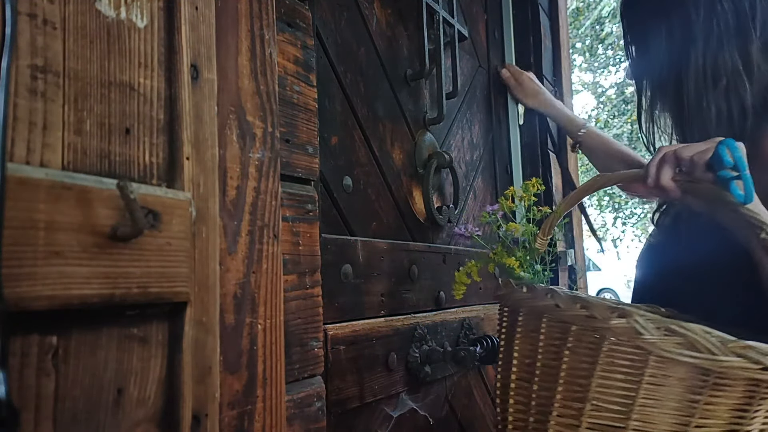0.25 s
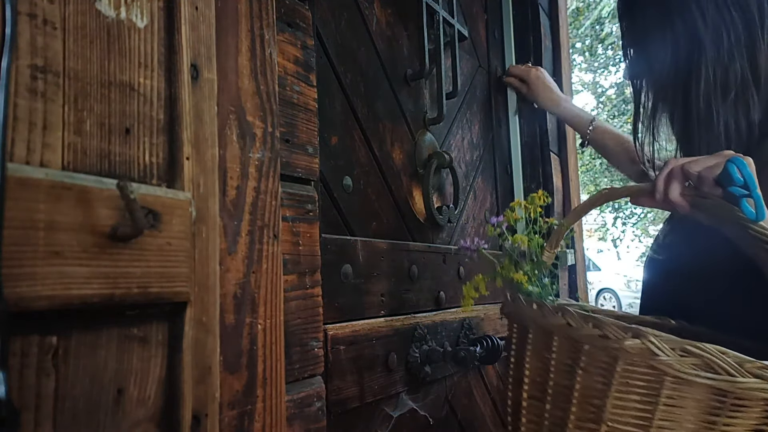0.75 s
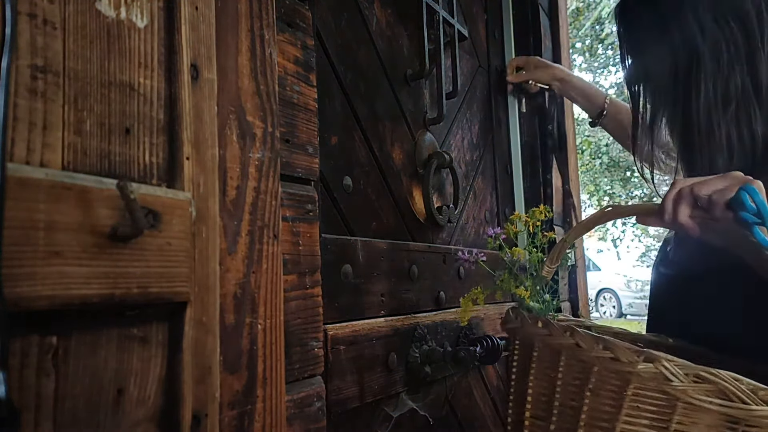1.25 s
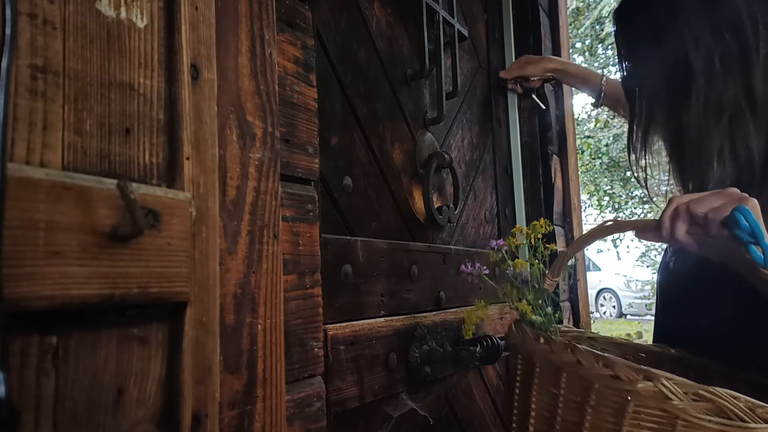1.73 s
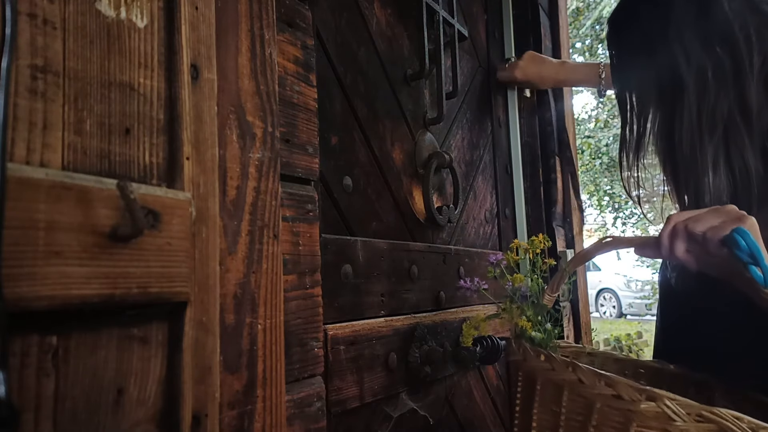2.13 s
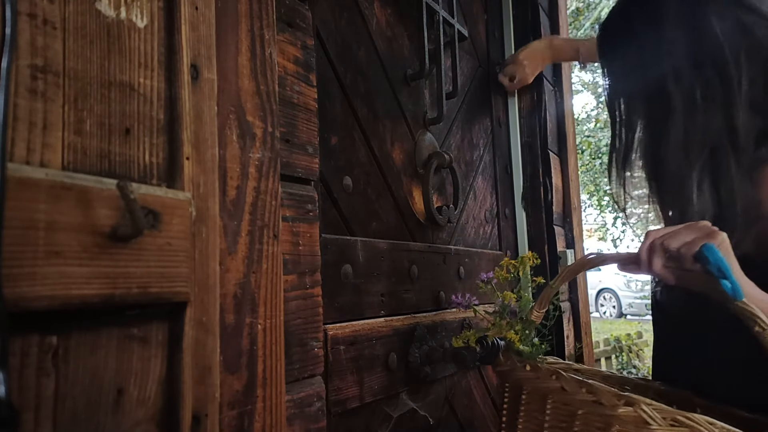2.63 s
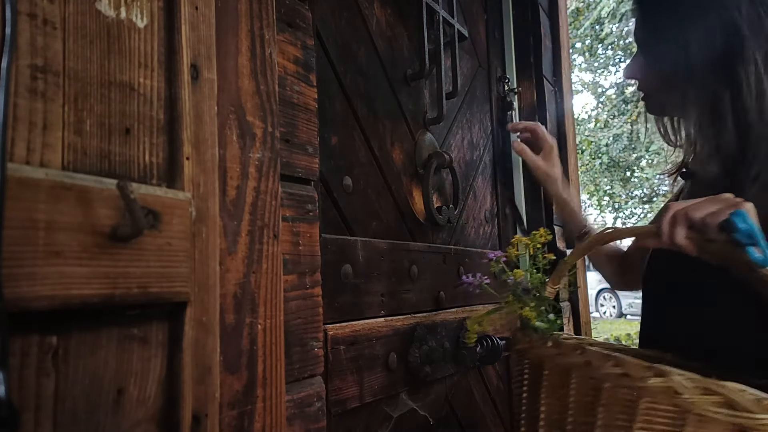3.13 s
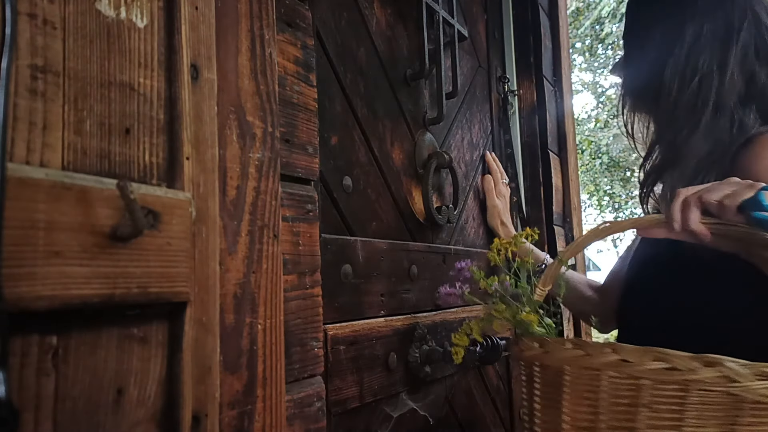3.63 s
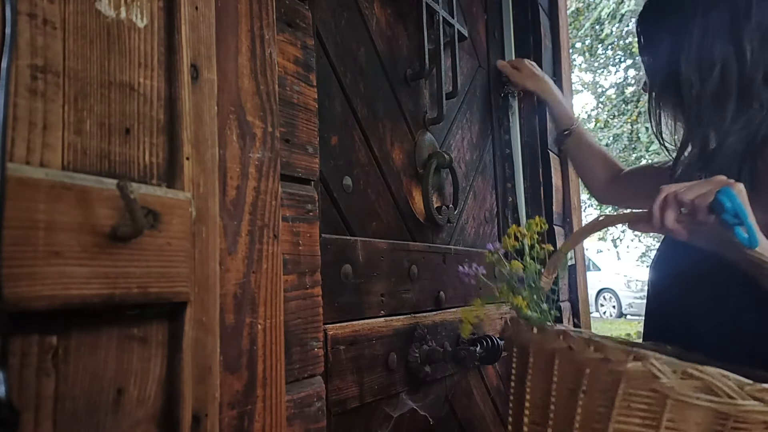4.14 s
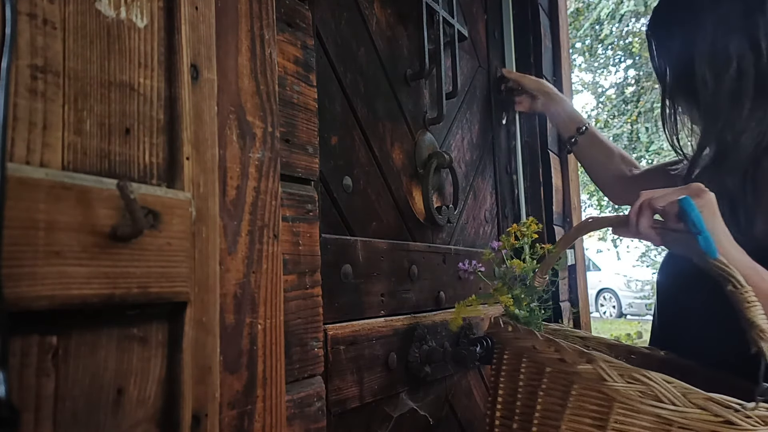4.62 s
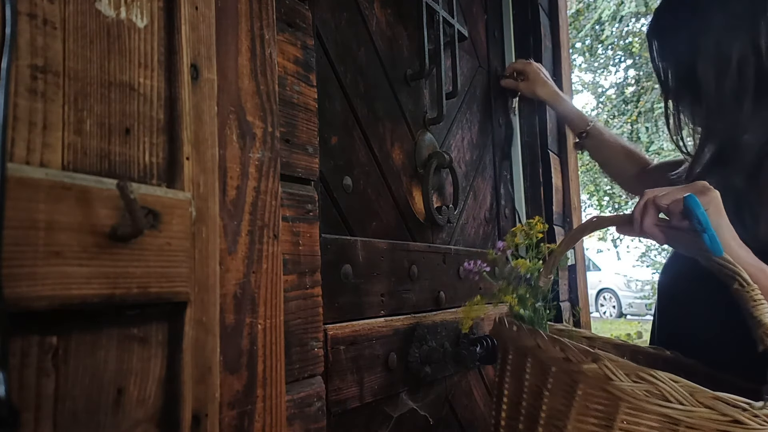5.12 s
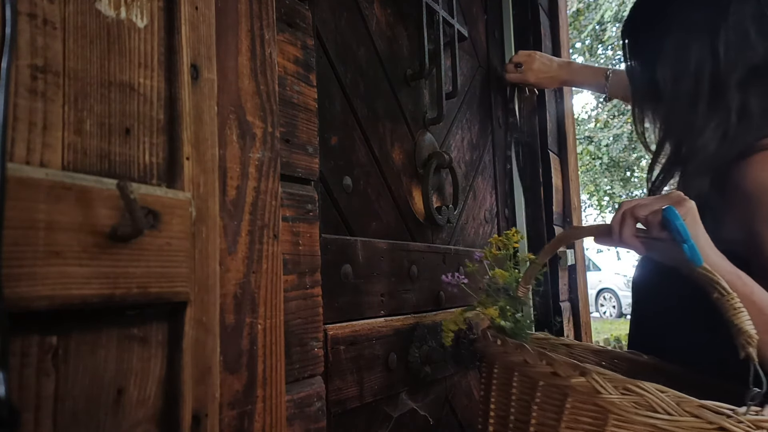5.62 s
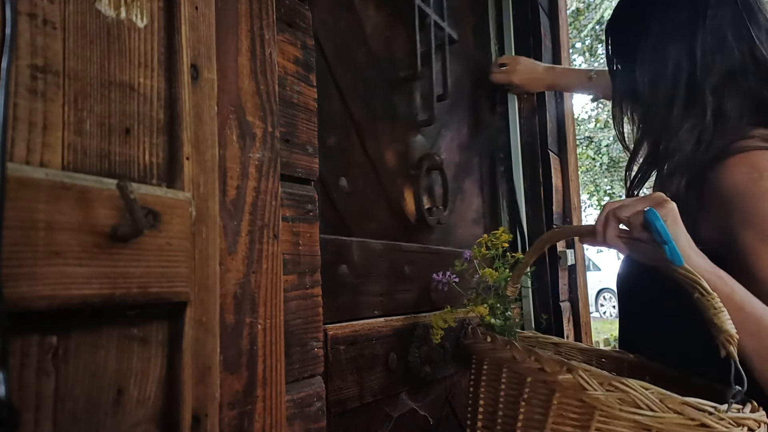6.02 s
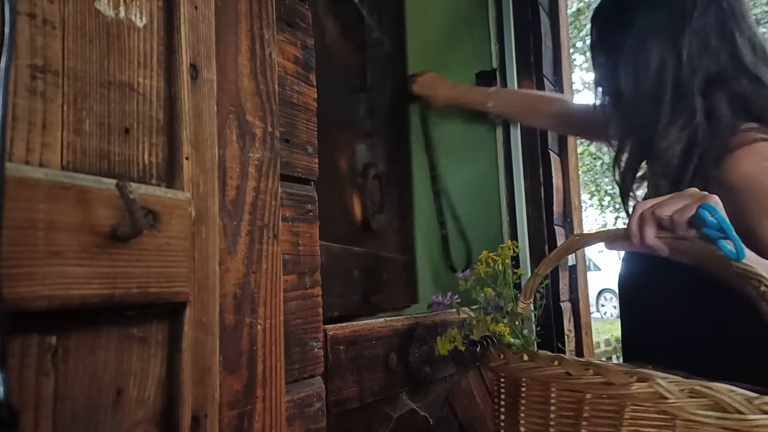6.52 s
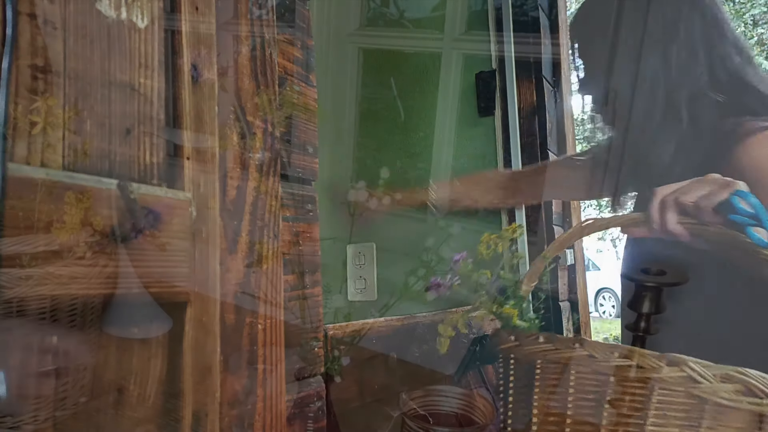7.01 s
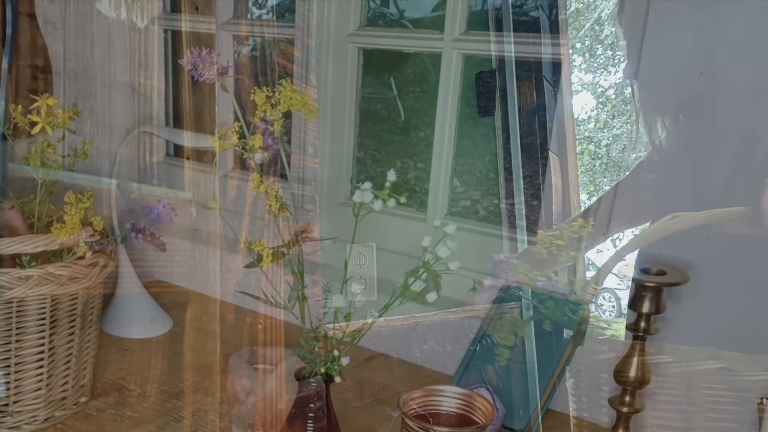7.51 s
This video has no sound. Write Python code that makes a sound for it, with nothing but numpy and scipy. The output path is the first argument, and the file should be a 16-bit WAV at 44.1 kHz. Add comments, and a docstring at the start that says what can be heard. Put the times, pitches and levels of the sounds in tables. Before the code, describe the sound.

Close to an old wooden door, a key clicks and knocks in an iron lock while keys chink. The bolt clacks over with a woody thump, the keys jingle brightly, then there is a quiet pause. More clicks follow, a second softer bolt clatter, scraping, and thin high hinge squeaks as the door opens. A low outdoor rumble and soft hiss run beneath.

```python
"""Clicks, scrapes and two iron clatters come from the lock of an old wooden door, and keys jingle on their ring.
The door is pushed open with thin hinge squeaks; a low rumble and soft hiss come from outdoors behind the porch.
Knocks and scrapes are bursts of noise that ring in the lock case; the thrown bolt also shakes the planks.
Keys are decaying tones set off by contact noise, squeaks are wavering tones, and outdoors is coloured noise."""
import sys
import numpy as np
from scipy import signal
from scipy.fft import rfft, irfft
from scipy.io import wavfile
from scipy.ndimage import uniform_filter1d

SR = 44100
rng = np.random.default_rng(int(sys.argv[2]) if len(sys.argv) > 2 else 0)


def waveform_to_disk(signal):
    """Save audio, clipped to [-1, 1], as 16-bit WAV at the path in sys.argv[1]."""
    frames = np.transpose(np.atleast_2d(signal))
    scaled = np.clip(frames, -1, 1) * 32767
    samples = np.round(scaled).astype(np.int16)
    wavfile.write(sys.argv[1], SR, samples)


N = 342216
HIT_SIZE = 16384  # samples in one hit
HIT_LEAD_S = 0.03  # a hit starts this long before the parts meet
AGE = np.arange(HIT_SIZE) / SR  # seconds since the start of a hit
TIME = np.arange(N) / SR  # seconds since the start of the scene

# the bolt reaching its stop: (time [s], level [dB], strongest ring [Hz])
THROWS = [(2.5703, -6, 1300), (5.4866, -11, 2130)]


def undb(db):
    """Turn decibels into gain."""
    return 10 ** (np.asarray(db) / 20)


def fade(t60):
    """Die away by 60 dB in t60 seconds."""
    return np.exp(-np.log(1000) * AGE / max(t60, 1e-3))


def level(x, db, span_s=0.01):
    """Scale a hit so that its energy, packed into span_s, has this rms level."""
    packed_power = np.mean(np.sum(x ** 2, axis=1)) / (span_s * SR)
    return x * undb(db) / np.sqrt(packed_power)


def curve(points, size):
    """Join (pitch [Hz], gain [dB]) points on a log-frequency axis, one value per FFT bin."""
    hz, db = np.transpose(points)
    bin_hz = np.fft.rfftfreq(size, 1 / SR)
    return np.interp(np.log(bin_hz + 1), np.log(hz), db)


def shape(x, db):
    """Filter with the given gain per bin; minimum phase lets the peaks ring on after a hit."""
    size = x.shape[-1]
    cepstrum = irfft(np.log(undb(db)), size)
    # folding the second half onto the first makes the filter act only forwards in time
    cepstrum[1:size // 2] *= 2
    cepstrum[size // 2 + 1:] = 0
    return irfft(rfft(x) * np.exp(rfft(cepstrum)), size)


def band(x, hz, kind):
    """Keep the low, middle or high part of a sound with a third-order filter."""
    return signal.sosfilt(signal.butter(3, hz, kind, fs=SR, output="sos"), x)


def add(out, s, x):
    """Mix x into out from time s on."""
    start = max(int(s * SR), 0)
    out[:, start:start + x.shape[1]] += x[:, :out.shape[1] - start]


def wander(rate, size=N):
    """Drift smoothly and randomly, with a spread near 1 and a new target rate times a second."""
    hold = int(SR / rate)
    steps = np.repeat(rng.standard_normal(size // hold + 1), hold)
    return np.sqrt(1.5) * uniform_filter1d(steps, hold)[:size]


def stereo_noise(alike_hz=1700, lag_ms=0.075):
    """Noise from the right: the left ear hears it later, and reflections make the treble unlike."""
    hz = np.fft.rfftfreq(HIT_SIZE, 1 / SR)
    likeness = 1 / (1 + hz / alike_hz)
    noise = rfft(rng.standard_normal((2, HIT_SIZE)))
    mid, side = noise * np.sqrt([1 + likeness, 1 - likeness])
    delay = np.exp(-2j * np.pi * hz * lag_ms / 1000)
    return irfft([(mid + side) * delay, mid - side])


def ring(hz, t60, scatter_db, detune):
    """One mode of a metal part; it differs from blow to blow and reaches each ear with its own share."""
    gain = undb(scatter_db * (rng.standard_normal((2, 1)) + rng.standard_normal()))
    pitch = hz * (1 + detune * rng.standard_normal())
    return gain * fade(t60) * np.sin(2 * np.pi * (pitch * AGE + rng.random((2, 1))))


def contact(t60, tail_db, tail_t60, rub_db, rub_s, grain_db, rise_s, closing_s=0.013):
    """Two parts rub as they close, meet HIT_LEAD_S later, chatter and slide on; the porch answers."""
    before, after = np.maximum(HIT_LEAD_S - AGE, 0), np.maximum(AGE - HIT_LEAD_S, 0)
    chatter = undb(-60 * after / t60)
    porch = undb(tail_db - 60 * after / tail_t60)
    blow = (1 - np.exp(-after / rise_s)) * (chatter + porch)
    fade_in = np.minimum(AGE / HIT_LEAD_S, 1)
    rub = undb(rub_db) * np.exp(-before / closing_s - after / rub_s) * fade_in
    grain = undb(grain_db * wander(500, size=HIT_SIZE))
    return stereo_noise() * (blow + rub) * grain


def rattle(length_s, per_s, rise_s, tail_db=-20, tail_t60=0.21, build_db=5):
    """Small, uneven contacts begin HIT_LEAD_S in, last length_s and tend to build up in the first half."""
    t60, scatter_db = 0.04, 8  # fade of one contact [s], unevenness [dB]
    count = max(int(length_s * per_s), 1)
    one = (1 - np.exp(-AGE / rise_s)) * (fade(t60) + undb(tail_db) * fade(tail_t60))
    power = np.zeros((1, HIT_SIZE))
    for k, (late, size) in enumerate(rng.uniform(-1, 1, (count, 2))):
        s = HIT_LEAD_S + length_s * min((k + (1 + late) / 2) / count, 1)
        gain = undb(scatter_db * size + build_db * min(2 * k / count, 1))
        add(power, s, (gain * one[None]) ** 2)
    return stereo_noise() * np.sqrt(power)


def outdoors(air_db=-9.5, rumble_top_hz=280):
    """A deep rumble, nearly the same in both ears, and a wide hiss; each swells in its own time."""
    # rise and fall: (time [s], rumble level [dB], hiss level [dB]); each counts from its middle value
    swell_points = [(0.0, -42.5, -47.5), (4.62, -41, -46), (5.42, -37.5, -47), (6.92, -41, -46.5),
                    (7.76, -43, -51.5)]
    # colour of the sound common to both ears: (pitch [Hz], relative level [dB])
    air_mid = [(15, -21), (26, -9), (43, -16), (56, 3.5), (76, -3), (97, -9.5), (150, -13), (290, -27.5),
               (600, -28), (730, -24), (1200, -27), (4000, -44), (5500, -57.5), (7700, -61), (8400, -55.5),
               (11500, -83), (16000, -80)]
    # colour of the sound unlike in the two ears: (pitch [Hz], relative level [dB])
    air_side = [(15, -41), (60, -37), (120, -25.5), (230, -33), (600, -35), (730, -27), (1150, -25.5),
                (4000, -44), (5500, -57), (7700, -58.5), (8400, -58.5), (11500, -78), (16000, -83)]
    mid = irfft(rfft(rng.standard_normal(N)) * undb(curve(air_mid, N)), N)
    side = irfft(rfft(rng.standard_normal(N)) * undb(curve(air_side, N)), N)
    air = np.array([mid + side, mid - side])
    s, *swells = np.transpose(swell_points)
    rumble_gain, hiss_gain = (undb(np.interp(TIME, s, db - np.median(db))) for db in swells)
    rumble = rumble_gain * band(air, rumble_top_hz, "lowpass")
    hiss = hiss_gain * band(air, rumble_top_hz, "highpass")
    return undb(air_db) * (rumble + hiss)


def planks(thump_db=-12):
    """The thrown bolt shakes the whole door, and its planks ring at low pitches."""
    # modes of the door planks: (pitch [Hz], relative level [dB], time to fade by 60 dB [s])
    plank_modes = [(125.5, -4.5, 0.44), (234, 0, 0.18), (276, -2.5, 0.11), (358, 1, 0.096), (383, 0, 0.13),
                   (501, 1.5, 0.07)]
    out, thump = np.zeros((2, N)), np.zeros(HIT_SIZE)
    for k, (hz, db, t60) in enumerate(plank_modes):
        # neighbouring modes start in opposite directions
        thump += (-1) ** k * undb(db) * fade(t60) * np.sin(2 * np.pi * hz * AGE)
    for s, db, _ in THROWS:
        add(out, s, level(np.array([thump, thump]), db + thump_db))
    return out


def hinges(jitter=0.0035, flutter_db=2, octave_db=-32):
    """Dry iron slips in step with one of its modes: a thin, wavering whistle with a faint octave."""
    # squeaks: (start [s], length [s], pitch [Hz], rise of pitch at mid-swing [Hz],
    # level before the bite [dB], moment of hardest bite [s])
    squeaks = [(6.289, 0.26, 6450, 60, -46.5, 6.535), (6.56, .09, 5100, 18, -68, 6.59),
               (7.01, 0.14, 4475, 10, -51.5, 7.048)]
    attack_s, release_t60 = 0.017, 0.25
    bite_db, bite_s = 14, 0.026  # swell as the hinge bites, and how far it spreads to each side
    out, age = np.zeros((2, N)), TIME[:SR]
    for s, length_s, hz, rise_hz, db, bite_at in squeaks:
        swing = np.sin(np.pi * np.minimum(age / length_s, 1))
        pitch = (hz + rise_hz * swing) * (1 + jitter * wander(130, size=SR))
        phase = 2 * np.pi * np.cumsum(pitch) / SR
        bite = bite_db * np.exp(-((s + age - bite_at) / bite_s) ** 2)
        release = np.exp(-np.log(1000) * np.maximum(age - length_s, 0) / release_t60)
        grip = np.minimum(age / attack_s, 1) * release * undb(db + bite)
        tone = grip * (np.sin(phase) + undb(octave_db) * np.sin(2 * phase))
        flutter = undb(flutter_db * np.array([wander(45, size=SR), wander(43, size=SR)]))
        add(out, s, tone * flutter)
    return out


def bunch(push, clash_db=-3):
    """Contacts set the bunch of keys shimmering, and their edges scrape."""
    # modes of the keys: (pitch [Hz], relative level [dB], time to fade by 60 dB [s])
    key_modes = [(6300, -20, 0.088), (6860, -9.5, 0.39), (7100, -16, 0.16), (7360, -10, 0.14),
                 (7895, 18.5, 0.036), (8350, -10, 0.18), (9200, -20, 0.32), (10200, -10, 0.13),
                 (10600, -18, 0.24), (12130, -1, .14), (12650, -11, .08), (13170, -3, .13),
                 (13000, 15, 0.025), (13740, 9.5, 0.076), (14050, -3, 0.065), (15670, -20, .2)]
    # colour of the scraping edges: (pitch [Hz], gain [dB])
    edges = curve([(1500, -3), (5000, -15.5), (7500, 7.0), (11500, -6.5), (13600, 13.5),
                   (14800, -1), (16000, -9)], HIT_SIZE)
    modes = sum(undb(db) * ring(hz, t60, scatter_db=3.0, detune=0.0083) for hz, db, t60 in key_modes)
    # every moment of the push sets the modes ringing anew
    shimmer = signal.fftconvolve(modes, push, axes=1)[:, :HIT_SIZE]
    return level(shimmer, 0) + level(shape(push, edges), clash_db)


def sparkle(x, sparkle_db, sparkle_hz=11000):
    """Where a key is struck decides between its lower and upper modes."""
    lower = level(band(x, sparkle_hz, "lowpass"), 0)
    upper = level(band(x, sparkle_hz, "highpass"), sparkle_db)
    return lower + upper


def jingle(length_s, clear_db=-11, low_hz=6800, high_hz=14000, count=5):
    """The bunch tumbles; here and there one key swings free and rings at its own pitch."""
    tumble = bunch(rattle(length_s, per_s=280, rise_s=0.002))
    for when, pitch in rng.random((count, 2)):
        free = ring(low_hz + (high_hz - low_hz) * pitch, t60=0.14, scatter_db=2.0, detune=0.002)
        add(tumble, HIT_LEAD_S + length_s * when, level(free, clear_db))
    return tumble


def keys(main_db=0):
    """In a chink one key rings clearly over the bunch; in a jingle they all tumble together."""
    # one key striking another:
    # (time [s], level [dB], sparkle against the lower modes [dB], strongest ring [Hz])
    chinks = [(0.155, -38.5, -12, 8680), (0.1984, -48, 1, 7150), (0.563, -42, -11, 8050),
              (0.606, -48, 5, 8630), (1.26, -32, -21, 8600), (1.723, -29.5, -19, 8550),
              (2.004, -38.5, -10, 7060), (2.2853, -37, -22, 8430), (2.3984, -36.5, 4, 14000),
              (2.519, -34, -5, 10550), (2.768, -28.5, -18, 7183), (2.8163, -26, -19, 9100),
              (3.006, -25, 0, 12140), (3.0901, -24.5, -8, 7170), (4.669, -51, -10, 5100),
              (5.0782, -31.5, -11, 13500), (5.222, -44, 14, 13600)]
    # the whole bunch shaken:
    # (start [s], length [s], level [dB], sparkle against the lower modes [dB])
    jingles = [(2.37, .1, -31, -11), (2.63, .085, -38, -1), (3.022, 0.11, -22.5, -7), (5.23, 0.1, -50, 0),
               (5.499, .05, -41, -8), (6.874, .06, -36, -5), (7.023, 0.056, -27.5, 1)]
    out = np.zeros((2, N))
    for s, db, sparkle_db, hz in chinks:
        push = contact(t60=0.04, tail_db=-23, tail_t60=0.22, rub_db=-25, rub_s=0.011,
                       grain_db=6.5, rise_s=0.00067)
        chink = bunch(push)
        clear_key = ring(hz, t60=0.12, scatter_db=2, detune=0.001)
        add(chink, HIT_LEAD_S, level(clear_key, main_db))
        add(out, s - HIT_LEAD_S, undb(db) * sparkle(chink, sparkle_db))
    for s, length_s, db, sparkle_db in jingles:
        add(out, s - HIT_LEAD_S, undb(db) * sparkle(jingle(length_s), sparkle_db))
    return out


def door_colour():
    """Gain per bin (dB) of the door with the resonances of its lock case."""
    # broad colour of a knock: (pitch [Hz], gain [dB])
    broad_colour = [(40, 6), (120, -3), (300, -7), (560, -1), (1100, -1), (1800, 4), (3300, -5.5),
                    (5500, -7), (9500, -10.5), (12000, -21), (16000, -26)]
    # resonances of the lock case: (pitch [Hz], half width [Hz], lift [dB])
    case_modes = [(385, 160, 7), (640, 57, 0.5), (760, 23, 2), (942, 105, 12), (1307, 110, 6),
                  (1520, 42, 4), (2040, 390, 1.5), (2570, 32, 7.5), (2832, 30, 7), (3163, 56, 8.5),
                  (3514, 200, 7), (4540, 26, 9), (7040, 190, 5.5), (8230, 160, 10)]
    hz = np.fft.rfftfreq(HIT_SIZE, 1 / SR)
    lift = sum(db / (1 + ((hz - f) / width) ** 2) for f, width, db in case_modes)
    return curve(broad_colour, HIT_SIZE) + lift


def favour(ring_hz, ring_db, width_hz):
    """Lift per bin (dB) of the one resonance that the place of contact favours."""
    hz = np.fft.rfftfreq(HIT_SIZE, 1 / SR)
    return ring_db / (1 + ((hz - ring_hz) / width_hz) ** 2)


def lock_case(push, colour, hardness_db, snap=1, crest_db=8.5, wood_hz=1200, steel_hz=5500, narrowing=0.35):
    """The wood thuds, the lock case clacks, the steel ticks; hard contacts lose the thud, soft ones the tick."""
    thud_db, tick_db = -8.5, -11  # for a contact of middling hardness
    body, loss_db = shape(push, colour), narrowing * abs(hardness_db)
    thud = level(band(body, wood_hz, "lowpass"), thud_db - hardness_db - loss_db)
    clack = level(band(body, [wood_hz, steel_hz], "bandpass"), -crest_db)
    tick = level(band(body, steel_hz, "highpass") * snap, tick_db + hardness_db - loss_db)
    return thud + clack + tick


def scrapes():
    """Key and latch judder along the iron and shake the same lock case."""
    # iron sliding on iron: (start [s], length [s], level [dB], hardness [dB], strongest ring [Hz])
    slides = [(1.689, .08, -28, -5, 1350), (2.627, 0.019, -30, 14, 4400), (3.04, .075, -18, -1, 2060),
              (5.227, 0.033, -26.5, -0.5, 3570), (5.908, .025, -43.5, 7, 1480),
              (6.009, .018, -31, 8.5, 1470), (6.115, .07, -23.5, 2, 3410)]
    out, door = np.zeros((2, N)), door_colour()
    for s, length_s, db, hardness_db, ring_hz in slides:
        colour = door + favour(ring_hz, ring_db=13.5, width_hz=100)
        judder = rattle(length_s, per_s=160, rise_s=0.00059)
        add(out, s - HIT_LEAD_S, undb(db) * lock_case(judder, colour, hardness_db))
    return out


def blows():
    """List every blow on the lock: single knocks, the clatter of the bolt and chance ticks."""
    # knocks of key and latch: (time [s], level [dB], hardness [dB], strongest ring [Hz])
    # hardness: + is steel on steel, - is dull on wood
    single_knocks = [(0.1574, -29.5, -3, 1650), (0.1758, -30.5, 0, 1050), (0.2533, -36.5, 2, 1120),
                     (0.3546, -26.5, -1, 1990), (0.3636, -25.5, -1, 1530), (0.7121, -24.5, -1.5, 1100),
                     (0.7225, -22, -4, 1200), (0.7514, -13, -3.5, 1356), (0.8459, -31.5, 11.5, 1440),
                     (0.9554, -25, -1, 4510), (1.259, -29.5, -6, 1005), (1.3523, -31.5, -8, 950),
                     (1.361, -28, 0, 1910), (1.3135, -37.5, -8, 3480), (1.5297, -36.5, -3, 1160),
                     (1.6162, -31.5, -2, 1410), (1.7215, -26, -2, 1070), (2.2766, -29.5, -3.5, 1220),
                     (2.5152, -23.5, 1.5, 1130), (2.62, -20, 9.5, 3230), (2.9583, -23.5, -4.5, 1650),
                     (3.1057, -22, 11.5, 4150), (4.153, -36, -2.5, 1050), (4.265, -38, 3.5, 1140),
                     (4.7002, -24, 2, 1390), (4.7228, -28.5, -1, 1170), (5.055, -25.5, -3, 1750),
                     (5.1807, -33.5, -4.5, 1870), (5.2217, -23, 8, 2025), (5.2509, -25.5, 3, 1070),
                     (6.0403, -26.5, 10, 1470), (6.097, -19.5, 2, 1480), (6.128, -16.5, 5.5, 1384),
                     (6.2184, -33.5, -7, 1130), (6.4462, -32, -9.5, 1200), (6.8808, -27.5, -2.5, 2150),
                     (6.9141, -23, -2.5, 1110), (6.9327, -24, -0.5, 1975)]
    # each throw is a first touch, the blow and two rebounds:
    # (delay [s], level against the throw [dB], hardness [dB])
    clatter = [(-.007, -15.5, -2), (0, -0.5, -2.5), (.009, -13, -12.5), (.017, -20.5, -7)]
    # the hand feeling about with the key, making faint ticks: (start [s], end [s], middle level [dB])
    fumbles = [(.8, 2.3, -43), (3.4, 3.55, -41), (5.3, 5.42, -41)]
    ticks_per_s, scatter_db, tick_hardness_db, tick_ring_hz = 5.4, 6.5, 7.5, 1120
    rows = list(single_knocks)
    for s, db, hz in THROWS:
        rows += [(s + delay, db + drop, hardness, hz) for delay, drop, hardness in clatter]
    for start, end, db in fumbles:
        count = max(round((end - start) * ticks_per_s), 1)
        for k, (place, size, hard) in enumerate(rng.uniform(-1, 1, (count, 3))):
            s = start + (end - start) * (k + (1 + place) / 2) / count
            hardness = tick_hardness_db + scatter_db * hard
            rows.append((s, db + scatter_db * size, hardness, tick_ring_hz))
    return rows


def knocks(snap_db=3, snap_s=0.00078, iron_db=-17):
    """Iron parts snap together and the lock case rings on."""
    out, door = np.zeros((2, N)), door_colour()
    # the treble is lifted at the instant of the blow
    snap = 1 + undb(snap_db) * np.exp(-np.abs(AGE - HIT_LEAD_S) / snap_s)
    for s, db, hardness_db, ring_hz in blows():
        # rubbing grows less with force than the blow does
        push = contact(t60=0.032, tail_db=-24, tail_t60=0.26, rub_db=-29 - 0.42 * db, rub_s=0.022,
                       grain_db=2.2, rise_s=0.0006)
        colour = door + favour(ring_hz, ring_db=9.5, width_hz=72)
        iron = ring(ring_hz, t60=0.047, scatter_db=1.5, detune=0.0031)
        add(out, s, level(iron, db + iron_db))
        add(out, s - HIT_LEAD_S, undb(db) * lock_case(push, colour, hardness_db, snap))
    return out


def scene():
    """Lock, keys and hinges reach two microphone ports from one side; outdoor sound comes from all around."""
    # colour of the two ports: (pitch [Hz], left gain [dB], right gain [dB])
    ports = np.array([(1300, -1.7, -4), (2320, 3, 4.5), (4330, 6, -3), (7370, -16.5, -4), (8380, -2.5, -26),
                      (11300, -1.5, -11), (13600, -5.5, -7), (15000, -6.5, -9)])
    air = outdoors()
    door = planks() + hinges() + keys() + scrapes() + knocks()
    heard = [shape(door[ear], curve(ports[:, [0, ear + 1]], N)) for ear in range(2)]
    return np.array(heard) + air


def record(dry):
    """A steep low-pass at 16 kHz leaves the sound without the very highest treble."""
    return signal.sosfilt(signal.ellip(8, 0.2, 80, 16000, fs=SR, output="sos"), dry)


dry = scene()
out = record(dry)
waveform_to_disk(out)
```